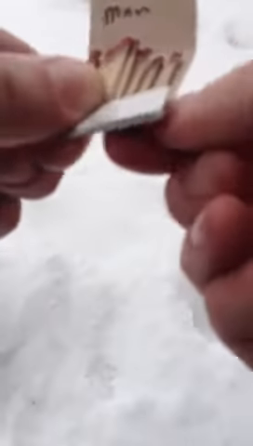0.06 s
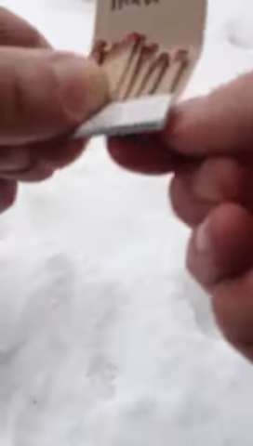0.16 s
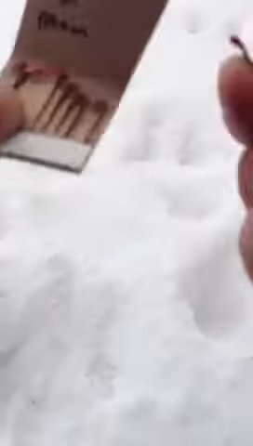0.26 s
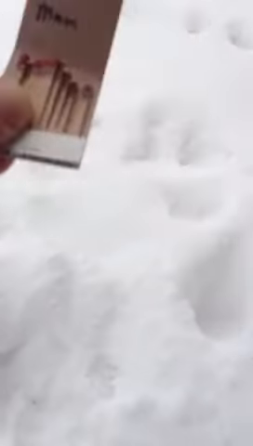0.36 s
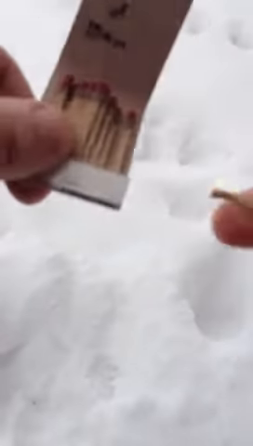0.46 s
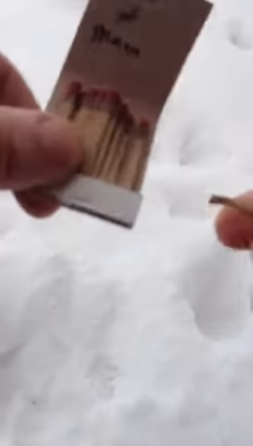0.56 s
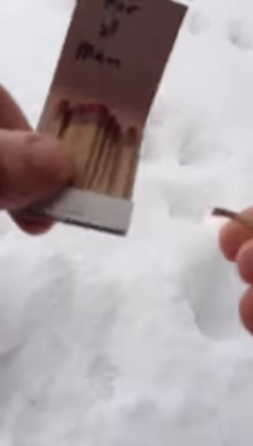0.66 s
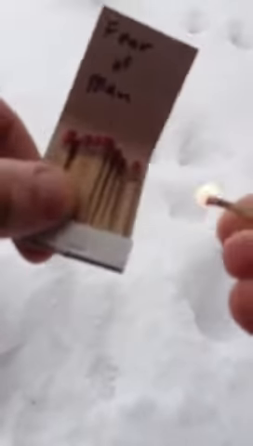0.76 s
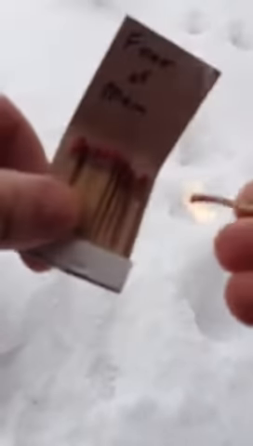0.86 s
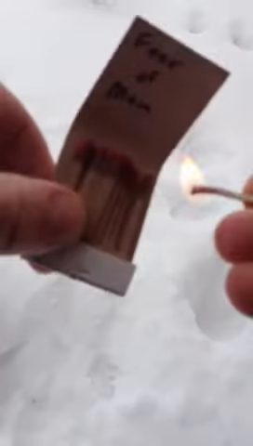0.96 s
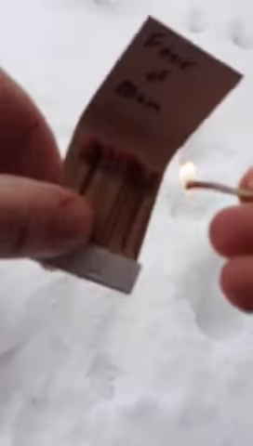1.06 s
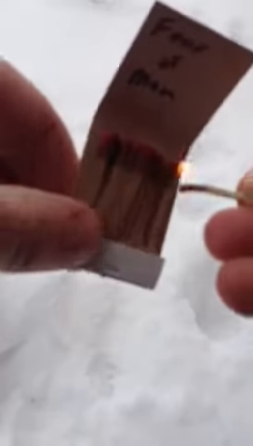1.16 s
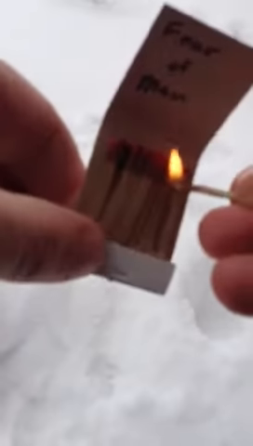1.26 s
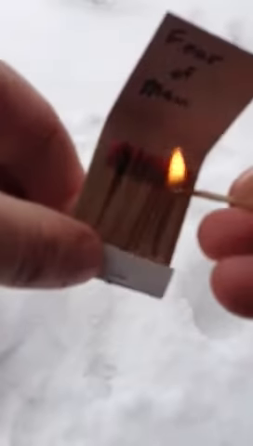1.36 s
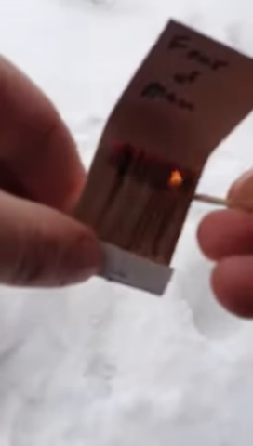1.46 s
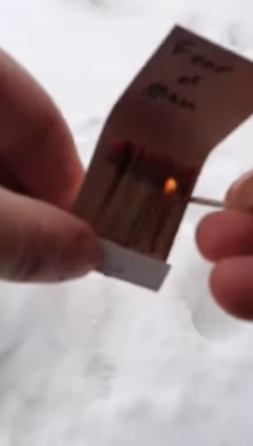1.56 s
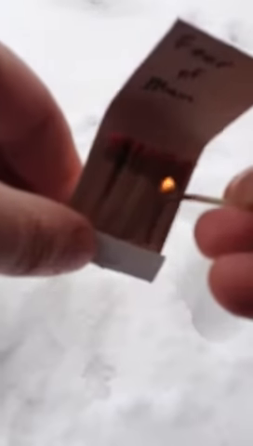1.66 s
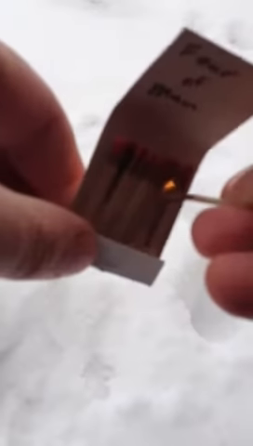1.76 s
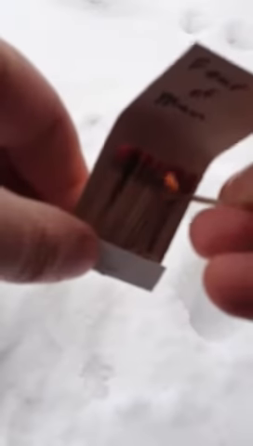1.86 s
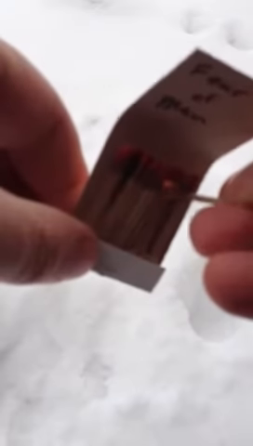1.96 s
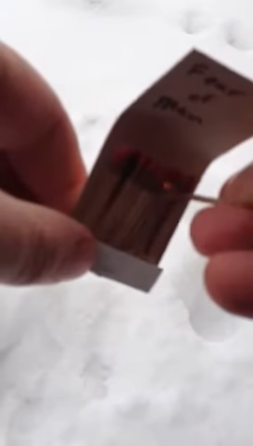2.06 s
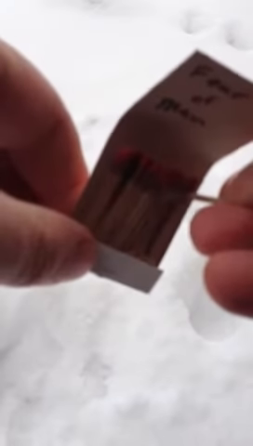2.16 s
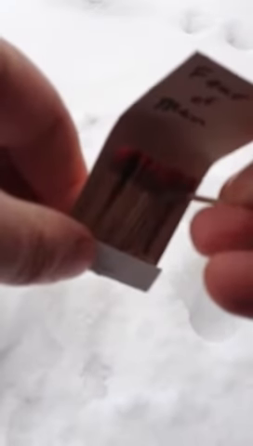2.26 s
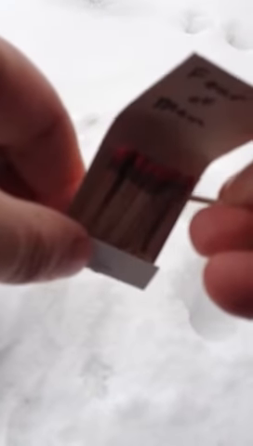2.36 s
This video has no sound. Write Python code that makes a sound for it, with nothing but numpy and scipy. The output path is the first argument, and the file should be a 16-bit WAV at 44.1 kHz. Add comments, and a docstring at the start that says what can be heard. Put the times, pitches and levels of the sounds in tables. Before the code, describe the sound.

A cardboard match rasps briefly and sharply on a striker strip, then a quiet fizz sputters in uneven puffs and thins to sparse crackles, close to a phone microphone in a quiet, snowy outdoor place.

```python
"""A match rasps over the striker strip of a card matchbook outdoors over snow, catches, fizzes and crackles.
The rasp is decaying rings, card thumps and treble snaps over a bed of random grains, as the card cover flaps once.
The burning head is gated filtered noise in puffs, with crackles made of the same kind of rings.
Behind it lie a thin hiss that mostly fades, a low sine hum that swells once with a breathy drone above it,
and the murmur of far traffic, which is filtered noise with a flickering bass."""
import sys
import numpy as np
from scipy import signal
from scipy.fft import rfft, irfft
from scipy.io import wavfile
from scipy.ndimage import uniform_filter1d

SR = 44100
rng = np.random.default_rng(int(sys.argv[2]) if len(sys.argv) > 2 else 0)


def boost(x):
    """Linear amplitude factor 10**(x/20) for a level x in decibels (scalar or array-like)."""
    u = np.asarray(x, float) / 20
    return 10 ** u


def inscribe(sig):
    """Save sig as 16-bit PCM at rate SR to the path in sys.argv[1].

    A 1-D sig is mono; a 2-D sig holds one channel per row.
    Samples are clipped to [-1, 1] before scaling.
    """
    pcm = np.round(np.clip(np.atleast_2d(sig).T, -1, 1) * 32767)
    wavfile.write(sys.argv[1], SR, pcm.astype(np.int16))


N = 105840  # samples

# microphone response to near clicks: frequency_hz, gain_db
MIC_RESPONSE = [(20, -42), (120, -2), (300, -0.5), (8200, 1.5), (9600, -10.5), (12000, -2), (15000, 6),
                (15500, -37), (22050, -77)]


def level(x, db):
    """Root-mean-square normalisation: scales a signal to an rms level in dB."""
    return x * boost(db) / np.sqrt(np.mean(x ** 2))


def colour(x, points):
    """Minimum-phase filtering: a folded cepstrum turns a magnitude curve in (Hz, dB) into a causal response."""
    hz, db = np.array(points, float).T
    size = 2048
    bins_hz = np.arange(size // 2 + 1) * SR / size
    log_gain = np.interp(np.log(bins_hz + 1), np.log(hz), db) * np.log(10) / 20
    cepstrum = irfft(log_gain)
    # folding negative time onto positive time makes the response causal
    cepstrum[1:size // 2] *= 2
    cepstrum[size // 2 + 1:] = 0
    response = irfft(np.exp(rfft(cepstrum)))
    return signal.fftconvolve(x, response)[:N]


def walk(rate):
    """Slow random modulation: normal values held for 1 / rate seconds, then smoothed twice."""
    hold = max(int(SR / rate), 1)
    held = np.repeat(rng.standard_normal(N)[:N // hold + 1], hold)
    return uniform_filter1d(uniform_filter1d(held, hold), hold)[:N]


def sparks(share, spread_db):
    """Impulsive noise: dense one-sample grains whose sizes have a long tail of loud ones."""
    present = rng.random(N) < share
    size = rng.exponential(size=N)
    return present * rng.standard_normal(N) * boost(spread_db * size)


def decay(t, t60):
    """Exponential damping: the amplitude falls by 60 dB in t60 seconds."""
    return np.exp(-np.log(1000) * t / t60)


def unit_band(x, low_hz, high_hz):
    """Band limitation: a Butterworth band-pass, brought to unit rms."""
    b, a = signal.butter(2, [low_hz, min(high_hz, 20000)], "band", fs=SR)
    return level(signal.lfilter(b, a, x), 0)


def ticks(rows, ring_s, attack_s, wide, rough, knocky, tail_db):
    """Impact excitation: each tick is a damped ring with a noisy tail, a low thump and a treble snap."""
    thump_t60_s, snap_t60_s, tail_t60_s = 0.0063, 0.0056, 0.012
    snap_hz = 13300
    out, span = np.zeros(N), 2048
    t = np.arange(span) / SR
    attack = 1 - np.exp(-t / attack_s)
    noises = rng.standard_normal((len(rows), 3, span))
    for (s, ring_db, hz, thump_db, snap_db, thump_hz), noise in zip(rows, noises):
        rattle = unit_band(noise[0], hz / wide, hz * wide)
        ring = decay(t, ring_s) * attack * (np.sin(2 * np.pi * hz * t) + rough * rattle)
        tail = boost(tail_db) * decay(t, tail_t60_s) * attack * rattle
        knock = unit_band(noise[1], 0.55 * thump_hz, 2.6 * thump_hz)
        thump = decay(t, thump_t60_s) * attack * (knocky * knock - np.sin(2 * np.pi * thump_hz * t))
        snap = decay(t, snap_t60_s) * attack * unit_band(noise[2], 0.62 * snap_hz, 0.98 * snap_hz)
        # thump and snap levels are relative to the ring
        tick = boost(ring_db) * (ring + tail + boost(thump_db) * thump + boost(snap_db) * snap)
        i = int(s * SR)
        out[i:i + span] += tick[:N - i]
    return colour(out, MIC_RESPONSE)


def strike(t):
    """Stick-slip friction: the head catches and slips on the strip over fine grit, and the cover flaps."""
    # slips of the head: start_s, ring_db, ring_hz, thump_db, snap_db
    slip_rows = [(0.2266, -33, 4180, -28, -22.5), (0.2417, -32.5, 4810, -20, -8),
                 (0.2484, -14, 4396, -9.5, -3.5), (0.2506, -13.5, 6300, -10, 0),
                 (.2553, -13.5, 4500, 1, -4.5), (0.2581, -22, 1363, -6.5, -14),
                 (0.2585, -16, 6560, -5.5, -5.5), (0.2615, -13, 4243, -8, -6.5),
                 (0.2634, -20, 3456, -25, -5), (.2734, -7, 6900, -16, -9.5),
                 (0.2731, -13, 8200, -12.5, -11), (0.2742, -9.5, 2410, -13, -16),
                 (0.2749, -10, 4500, -22, -12.5), (0.2764, -15.5, 2414, -12.5, -18),
                 (.2782, -18, 3076, -2, -15), (.2840, -19.5, 4000, -14, -13),
                 (0.2858, -20.5, 4940, -15, -15), (.2990, -30.5, 6500, -12.5, -6),
                 (.3010, -27.5, 3490, -14, -12.5), (.3038, -32, 4510, -12.5, -16),
                 (.3150, -38.5, 6600, -12.5, -14.5), (0.3274, -35.5, 6400, -14.5, -15)]
    # grit under the moving head: time_s, level_db
    grit_curve = [(0.234, -65), (0.244, -48.5), (0.251, -24), (0.258, -28.5), (.266, -29), (0.27, -32),
                  (0.276, -19), (0.284, -40), (0.285, -29.5), (0.294, -48.5), (.302, -45.5), (.312, -51),
                  (.345, -58.5), (.37, -83)]
    # relative spectrum of the grit: frequency_hz, density_db (per Hz)
    grit_spectrum = [(35, -47), (60, -26), (550, -0.5), (1570, -4), (1760, -8.5), (2330, -1), (3020, -7.5),
                     (4280, 3.5), (5800, -6), (8220, -6), (9460, -19.5), (14700, -14), (15800, -31)]
    card_thump_hz = 794  # the card under the strip
    slips = ticks([row + (card_thump_hz,) for row in slip_rows], ring_s=0.0046, attack_s=0.00006,
                  wide=1.38, rough=0.36, knocky=0.56, tail_db=-16)
    flap_s, flap_hz, flap_db, flap_t60_s = 0.274, 212, -30, 0.0503
    after = np.maximum(t - flap_s, 0)
    flap = boost(flap_db) * np.sin(2 * np.pi * flap_hz * after) * decay(after, flap_t60_s)
    grit = level(colour(sparks(0.4, 2.2), grit_spectrum), 0) * boost(2.5 * walk(400))
    s, db = np.array(grit_curve).T
    grit = grit * boost(np.interp(t, s, db, left=-120, right=-120))
    return slips + colour(flap, MIC_RESPONSE) + grit


def patchy(x, depth_db, rate):
    """Independent band modulation: the sound splits into bands, and each flickers on its own."""
    # limits of adjoining bands: edge_hz
    band_edges = [1800, 3200, 4000, 5100, 6300, 8000, 11000, 15800]
    out = np.zeros(N)
    for edges in zip(band_edges, band_edges[1:]):
        band = signal.sosfiltfilt(signal.butter(2, edges, "band", fs=SR, output="sos"), x)
        out = out + band * boost(depth_db * walk(rate))
    return out


def high_part(x, hz):
    """Zero-phase high-pass: keeps the part above a frequency without delay."""
    return signal.sosfiltfilt(signal.butter(4, hz, "high", fs=SR, output="sos"), x)


def smooth_step(x):
    """Logistic transition: rises smoothly from 0 to 1 around x = 0."""
    return 1 / (1 + np.exp(np.clip(-x, -50, 50)))


def flame(t):
    """Turbulent jet noise: gas leaves in uneven puffs, grainy on top and fluttering below, with crackles."""
    # puffs of gas: start_s, length_s, gain_db, low_gain_db, treble_gain_db (the last two relative)
    puffs = [(0.328, 0.076, -68.5, -18, 12.5), (0.406, 0.03, -58, -3, 6.5), (0.456, 0.051, -63, 2.5, 6.5),
             (.512, 0.063, -60, 3.5, 4), (0.589, 0.12, -66, -13, 4.5), (0.698, 0.043, -57.5, -1, 3.5),
             (0.753, 0.068, -63.5, -5, 7.5), (0.819, 0.039, -55, 5, 2), (0.858, 0.086, -53.5, 2, 3),
             (0.955, 0.033, -56.5, -2, 0), (1.127, 0.011, -58, -22, 10.5), (1.142, 0.007, -60.5, -20, 12),
             (1.155, 0.039, -62, -10, 7.5), (1.2, 0.1, -67.5, -3.5, 5.5), (1.328, 0.1, -71, -23, 5.5),
             (1.858, 0.023, -67, -22, 7.5), (2.285, 0.081, -71.5, 2, -2)]
    # relative spectrum of the grainy fizz: frequency_hz, density_db (per Hz)
    fizz_spectrum = [(1060, -39), (1800, -13), (2120, -9.5), (2710, 0), (4550, 2.5), (5070, -8),
                     (5920, -5.5), (7300, -8.5), (10400, -25), (14700, -14), (15800, -42)]
    # relative spectrum of the low flutter: frequency_hz, density_db (per Hz)
    flutter_spectrum = [(180, -31.5), (300, -7), (332, -19), (419, -7), (625, -4.5), (2200, -13.5),
                        (2860, -39), (4840, -120)]
    # highest treble of the puffs: time_s, gain_db
    air_curve = [(.8, -7), (.87, -2), (.98, 4), (1.05, 0), (1.12, -7), (1.3, 1)]
    # crackles: start_s, ring_db, ring_hz, thump_db, snap_db, thump_hz
    crackle_rows = [(.4205, -37, 6000, -13, -14, 520), (.4505, -35.5, 4700, -10, -15, 520),
                    (.5145, -42, 4500, -2, -11, 520), (.5425, -33, 4600, -18, -20, 520),
                    (.632, -39, 1010, 0, -20, 550), (.885, -34.5, 3430, -2, -15, 800),
                    (1.2398, -34.5, 3500, -11, -21, 517), (1.3695, -35.5, 4120, -31, -26, 520),
                    (1.414, -43, 3700, -19, -22, 521.6), (1.8496, -44, 3820, -28, -12, 521),
                    (1.85205, -21.5, 4020, -19, -34, 1050), (1.8668, -49, 7500, -19.5, 3, 524),
                    (1.867, -44, 3950, -22, -25, 520), (1.894, -49, 4020, -20, -16, 518),
                    (2.1459, -27, 4110, -31, -25, 470), (2.14635, -36.5, 4400, 3, -24, 457),
                    (2.1475, -38, 6160, -7, -16, 1320)]
    treble_hz, air_hz = 5100, 11500
    rise_s, fall_s = 0.002, 0.006

    fizz = level(colour(sparks(0.4, 1.7), fizz_spectrum), 0)
    fizz = patchy(fizz, depth_db=1.5, rate=21.5)
    treble = high_part(fizz, treble_hz)
    mid = (fizz - treble) * boost(2.0 * walk(59.8))
    treble = treble * boost(2.2 * walk(50.5))
    air = high_part(treble, air_hz)
    treble = treble - air + air * boost(np.interp(t, *np.array(air_curve).T))
    low = level(colour(rng.standard_normal(N), flutter_spectrum), -3) * boost(2.5 * walk(39.92))

    out = ticks(crackle_rows, ring_s=0.0023, attack_s=0.0001, wide=1.3, rough=0.08, knocky=0.2, tail_db=-27)
    for s, length, db, low_db, treble_db in puffs:
        gate = smooth_step((t - s) / rise_s) * smooth_step((s + length - t) / fall_s)
        out = out + gate * boost(db) * (mid + boost(low_db) * low + boost(treble_db) * treble)
    return out


def resonance(hz, width_hz):
    """Resonant filtering: white noise through a narrow peak becomes a breathy tone."""
    b, a = signal.iirpeak(hz, hz / width_hz, SR)
    return signal.lfilter(b, a, rng.standard_normal(N))


def hiss(t):
    """Broadband noise with resonances: a thin hiss close by, with two narrow bands, that mostly fades."""
    # loudness of the hiss: time_s, level_db
    hiss_curve = [(0, -60), (.22, -58), (.55, -68.5), (.62, -64.5), (0.949, -63), (1.05, -67), (1.25, -67),
                  (1.5, -81), (2.4, -74)]
    # relative spectrum of the hiss: frequency_hz, density_db (per Hz)
    hiss_spectrum = [(240, -44.5), (400, -8.5), (588, 2.5), (718, -10.5), (877, -4.5), (1050, -9),
                     (1670, -17.5), (2210, -10), (2460, -11.5), (4620, -17), (9510, -26), (14600, -33.5),
                     (15800, -30.5)]
    # narrow bands: centre_hz, width_hz, level_db (relative to the broad hiss)
    narrow_bands = [(2345, 140, -10), (4600, 150, -8.5)]
    air = level(colour(rng.standard_normal(N), hiss_spectrum), 0)
    for hz, width_hz, band_db in narrow_bands:
        air = air + level(resonance(hz, width_hz), band_db)
    s, db = np.array(hiss_curve).T
    return air * boost(np.interp(t, s, db) + 0.49 * walk(39))


def hum(t):
    """Frequency modulation: a far low sine wavers in pitch and level under a fainter breathy drone."""
    # course of the hum: time_s, pitch_hz, level_db
    hum_curve = [(1.0, 192, -80), (1.05, 187.2, -66), (1.15, 178.8, -59), (1.42, 183.5, -59),
                 (1.57, 180, -57), (1.62, 177, -67)]
    s, hz, db = np.array(hum_curve).T
    pitch_hz = np.interp(t, s, hz) * (1 + 0.014 * walk(20))
    phase = 2 * np.pi * np.cumsum(pitch_hz) / SR
    tone_db = np.interp(t, s, db, left=-120, right=-120) + 0.98 * walk(28)
    tone = np.sqrt(2) * np.sin(phase) * boost(tone_db)  # the root makes the level an rms level
    return tone + level(resonance(290, width_hz=11), -70)


def town():
    """Superposed distant sources act as noise: in far traffic and air the bass flickers, the rest is smooth."""
    # relative spectrum of the murmur: frequency_hz, density_db (per Hz)
    town_spectrum = [(15, -76), (25, -47.5), (70, -30.5), (99, -16), (179, -4.5), (216, -12.5),
                     (371, -13.5), (449, -14), (905, -18.5), (2090, -30.5), (2660, -29), (6660, -36),
                     (9460, -48), (14600, -38), (15800, -49)]
    murmur = colour(rng.standard_normal(N), town_spectrum)
    bass = signal.sosfiltfilt(signal.butter(2, 350, fs=SR, output="sos"), murmur)
    rest = murmur - bass
    return level(bass * boost(2.7 * walk(10)) + rest * boost(0.8 * walk(3.8)), -59.5)


def scene():
    """Linear superposition: all sources add at one microphone, the same on both channels."""
    t = np.arange(N) / SR
    mix = strike(t) + flame(t) + hiss(t) + hum(t) + town()
    return np.tile(mix, (2, 1))


def top_cut(x):
    """Nothing passes above the cut-off."""
    return signal.sosfilt(signal.butter(12, 16400, fs=SR, output="sos"), x)


def record(dry):
    """Band limitation: the phone cuts the top with a steep elliptic low-pass at 15.3 kHz."""
    low_pass = signal.ellip(10, 0.2, 70, 15300, fs=SR, output="sos")
    mix = signal.sosfilt(low_pass, dry)
    return top_cut(mix)


dry = scene()
out = record(dry)
inscribe(out)
```